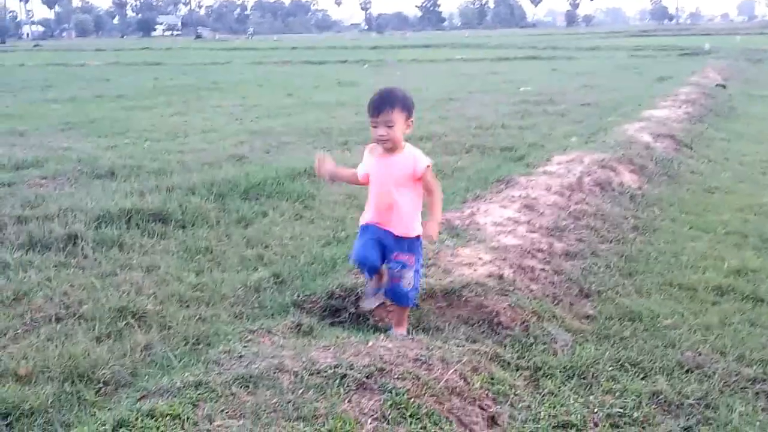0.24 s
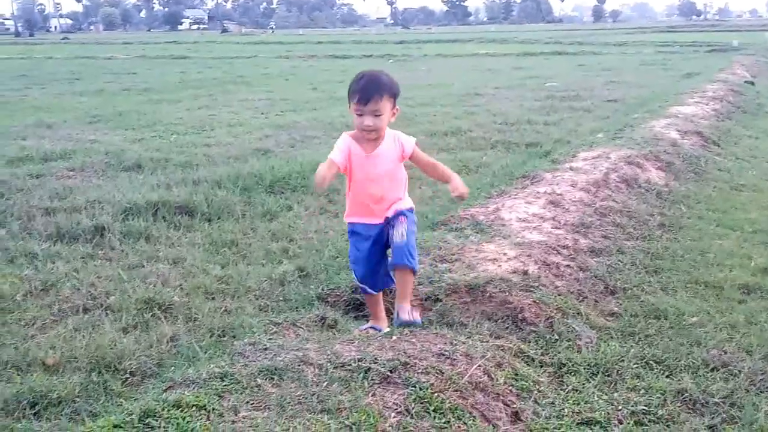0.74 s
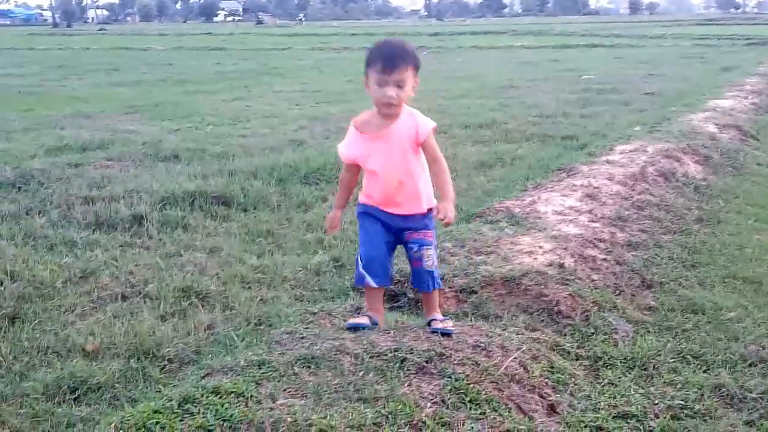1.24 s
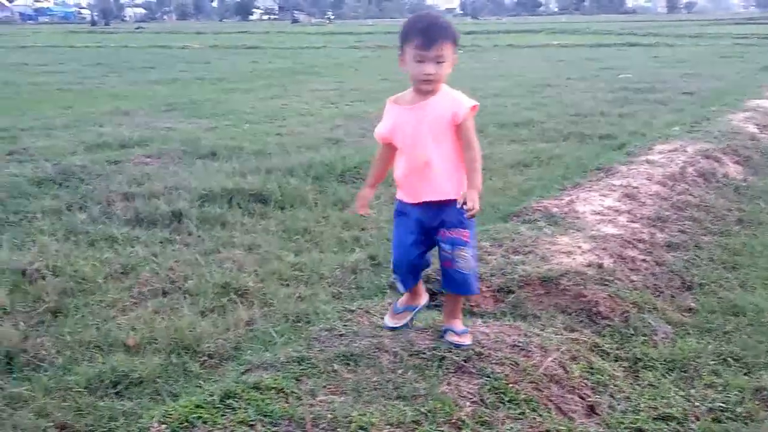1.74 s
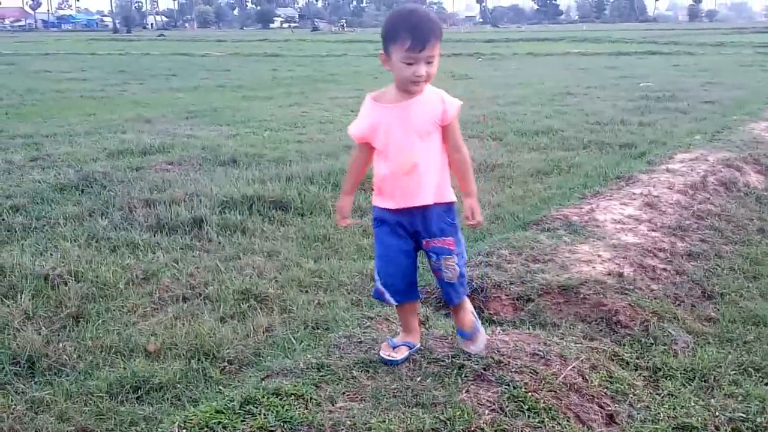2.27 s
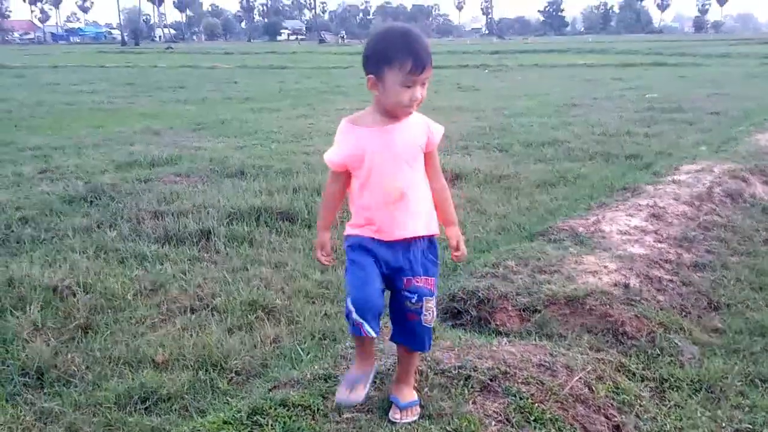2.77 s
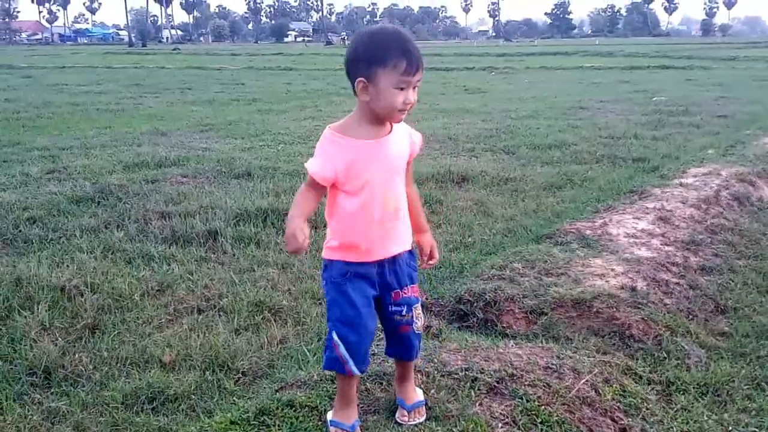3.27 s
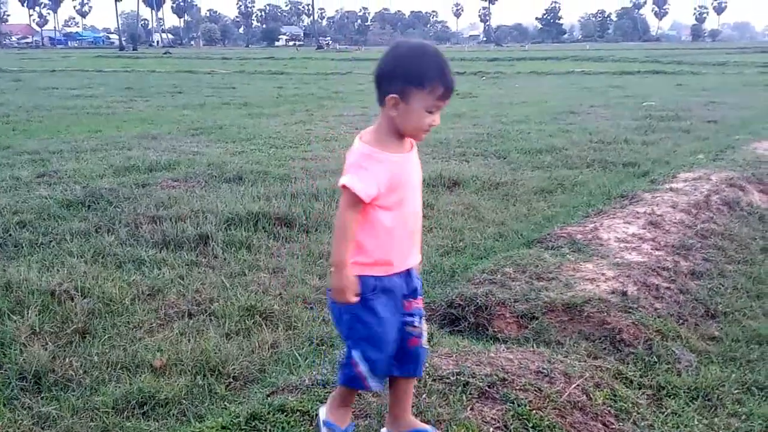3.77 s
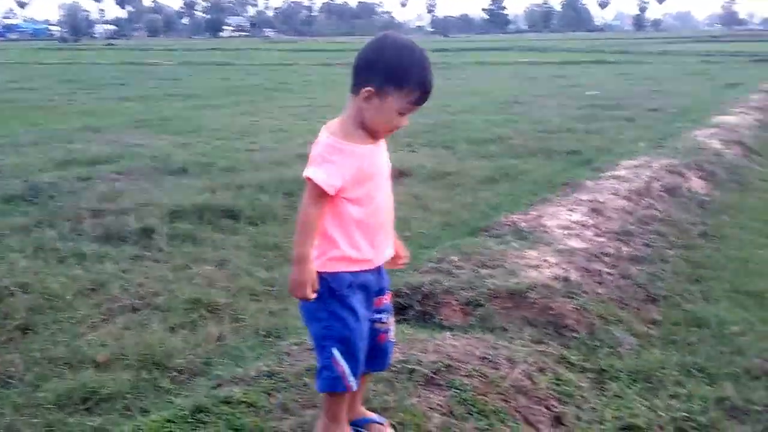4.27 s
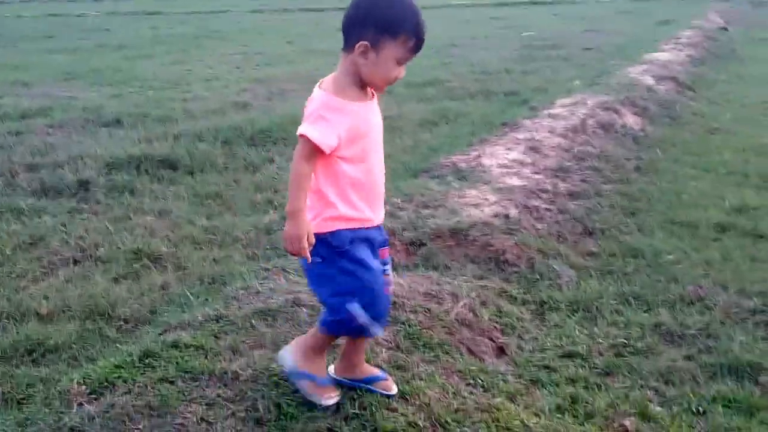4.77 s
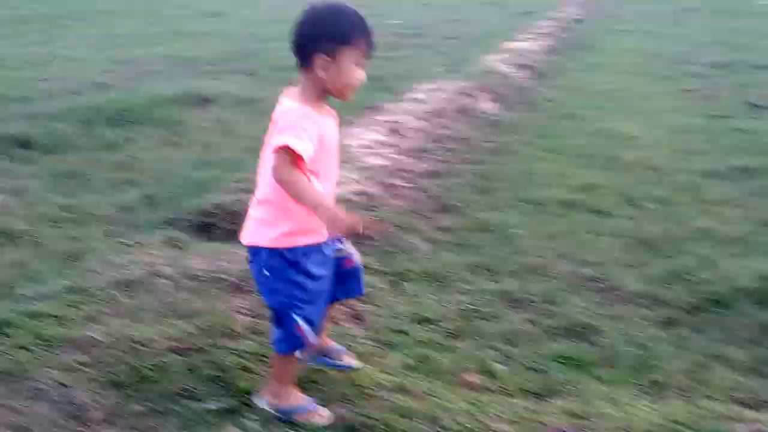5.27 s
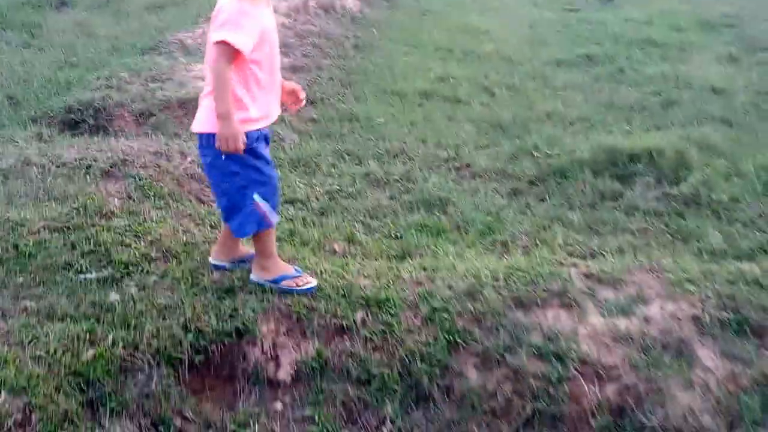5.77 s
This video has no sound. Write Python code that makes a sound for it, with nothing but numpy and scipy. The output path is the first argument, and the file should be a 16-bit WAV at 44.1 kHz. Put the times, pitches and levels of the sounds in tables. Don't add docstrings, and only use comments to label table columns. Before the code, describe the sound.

Evening field ambience: fast cricket trills, blurred flock chatter, low wind knocks, faint engine putter, soft grassy footsteps, then repeated chips and high whistles.

```python
import sys
import numpy as np
from scipy import signal
from scipy.fft import rfft, irfft
from scipy.io import wavfile
from scipy.ndimage import uniform_filter1d

SR = 44100
rng = np.random.default_rng(int(sys.argv[2]) if len(sys.argv) > 2 else 0)


def voltage_ratio(decibels):
    exponent = np.asarray(decibels, float) / 20
    return 10 ** exponent


def wrap_up_sound(samples):
    columns = np.atleast_2d(samples).T
    tamed = np.clip(columns, -1, 1)
    steps = np.round(tamed * 32767).astype(np.int16)
    wavfile.write(sys.argv[1], SR, steps)


N = 265482
T = np.arange(N) / SR
BLUR_HZ, BLUR = 110, .4

# (time [s], lead over the mean trill beat [turns], level [dB])
NEAR_CRICKET = [(0, -.32, -55.5), (1.6, -.3, -53.5), (2.7, -.36, -54.5), (3.5, -.36, -57), (4.5, -.36, -54),
                (5.2, -.36, -55.4), (5.5, -.29, -57), (6, -.27, -56.5)]
SECOND_CRICKET = [(0, -.06, -71.5), (2.2, .36, -65.5), (3.7, .25, -65), (6, .21, -73)]
THIRD_CRICKET = [(0, -.29, -71), (1.6, -.05, -74), (2.6, -.3, -84.5), (6, -.2, -84.5)]
TRILL_HZ = 8.31, 8.6, 8.51
WING_HZ = 8860, 12780, 9200, 9850
CRICKET_TRIM_DB = 8, -23, 13, 13.5

# (time [s], level [dB])
CHORUS_LEVEL = [(0, -51.5), (1.0, -50.5), (2.2, -54), (2.6, -52.5), (4.0, -55.5), (4.3, -51), (5.15, -52.5),
                (5.5, -52.5), (6.02, -51)]
# (frequency [Hz], level per Hz [dB])
CHORUS_COLOUR = [(710, -45), (1200, -119), (1270, -30), (1650, -11), (2190, -16), (2440, -18), (2740, -2),
                 (3390, 0.5), (3560, -0.5), (4260, -15.5), (5000, -21.5), (6500, -67), (11000, -120)]
# (middle time [s], length [s], rise [dB])
CHORUS_SWELLS = [(0.118, 0.078, 5), (0.483, 0.14, 3), (0.74, 0.073, 5), (0.996, 0.076, 5.5),
                 (1.242, 0.14, 4.5), (1.47, 0.27, 4.5), (1.7, 0.081, 7), (1.887, 0.23, 5),
                 (2.122, 0.24, 6.5), (2.356, 0.13, 6), (2.633, 0.087, 2), (2.9, 0.17, 1), (3.26, 0.044, 0),
                 (3.554, 0.05, 2), (3.918, 0.08, 7.5), (4.035, 0.081, 5), (1.77, .025, -4), (2.55, .05, -3),
                 (0.208, .03, -2.5), (0.408, 0.027, -2.5), (.57, 0.033, -2.5), (5.015, 0.1, 1),
                 (5.55, 0.12, 5), (5.785, 0.1, 6)]

# (time [s], level [dB])
WIND_LEVEL = [(0.0, -53), (0.1, -46), (0.35, -48.5), (1.6, -48), (2.8, -51), (3.12, -39), (3.3, -49),
              (3.57, -46.5), (3.7, -45), (4.2, -51), (4.68, -45), (4.78, -51), (4.95, -44.5), (5.2, -54),
              (5.6, -48.5), (5.82, -51), (6.02, -36)]
# (frequency [Hz], level per Hz [dB])
WIND_COLOUR = [(12, -84), (20, -49), (101, 2), (189, -7.5), (248, -13), (330, -17.5), (365, -21.5),
               (409, -30.5), (543, -45.5), (600, -58), (780, -82), (1320, -120)]
# (frequency [Hz], share [dB])
LOOSE_EDDIES = [(55, 0), (90, -30)]
# (time [s], peak level [dB], pitch [Hz], length [s])
AIR_KNOCKS = [
    (0.287, -20.5, 101, 0.034),
    (2.829, -18, 136.5, 0.033),
    (3.158, -16, 130, 0.022),
    (3.178, -11, 160, 0.025),
    (4.266, -17, 82.4, 0.028),
    (4.825, -16.5, 108, 0.015),
    (5.929, -16, 110, 0.029),
]

# (time [s], level [dB])
ENGINE_LEVEL = [(0.0, -54), (0.03, -45.5), (1.0, -61.5), (1.05, -42.5), (3.08, -44.5), (3.19, -37),
                (3.22, -42.5), (5.73, -54.5), (6.02, -46)]
# (time [s], lead [turns])
CRANK_LEAD = [(0, -.17), (.5, -.24), (1.25, -.41), (1.75, -.55), (2.25, -.62), (2.75, -.49), (3.25, -.26),
              (3.75, .06), (4.1, .2), (6.02, .6)]
# (frequency [Hz], width [Hz], level [dB])
EXHAUST_PIPE = [(129, 111, 2.5), (220, 92, 1), (330, 68, -33)]

# (frequency [Hz], level per Hz [dB])
LEAF_COLOUR = [(350, -25), (600, 3), (1100, -4), (1900, 13), (2500, -39), (4600, 2), (7300, 6.5),
               (8000, 12.5), (16500, -28.5)]
# (frequency [Hz], level per Hz [dB])
INSECT_COLOUR = [(7900, -9), (8500, 0), (9300, 1), (9700, -9), (10600, -1.5), (11400, 1), (12000, -44),
                 (13300, -24), (13900, -18), (14800, -9), (16500, -32)]

# (time [s], peak level [dB], length [s], top brightness [dB], body [dB])
STEPS = [(0.158, -46, 0.053, -29, -3), (0.349, -43, 0.0082, -17, 1), (0.476, -42.5, 0.058, -29, -11),
         (0.9418, -44, 0.03, -13, -5), (1.125, -32, 0.015, -1, 0), (1.522, -36.5, 0.03, -6, -9),
         (1.862, -42, 0.066, -30, -22), (1.932, -44, 0.035, -3.5, -14), (2.232, -68, 0.03, -4, -1),
         (2.49, -45, 0.046, 2, -4), (2.618, -42, 0.018, -32, -7), (2.882, -41.5, 0.053, -7, -4.5),
         (3.226, -46, 0.097, -27, -12), (3.32, -44, 0.12, 0, -19), (3.453, -54.5, 0.051, -35, 2),
         (3.533, -51.5, 0.12, 5, 4), (3.72, -76, 0.03, -2, -4), (3.944, -49, 0.049, -25, 9),
         (3.98, -39.5, 0.048, 5, -3), (4.522, -46.5, 0.048, -31, 4), (4.593, -43, 0.051, 2, 0),
         (4.88, -47, 0.027, -8, 11), (4.988, -40.5, 0.036, 10.5, -0.5), (5.137, -58, 0.071, -30, 14)]
# (time [s], level [dB], top brightness [dB])
GRASS_SWEEP = [(4.45, -63, -16), (4.6, -64, -1), (4.75, -67.5, -2), (5.22, -67.5, -8), (5.3, -59, 4.5),
               (5.52, -53.5, 15), (5.8, -52.5, 5.5), (6.02, -62, 3)]
# (frequency [Hz], level per Hz [dB])
GRASS_COLOUR = [(400, -64), (800, -6), (2000, 5.5), (4000, 7), (6500, 2.5), (9500, 1), (12000, -13.5),
                (13700, -14), (15000, -4.5), (17000, -4)]

# (time [s], pitch [Hz], bend [Hz], length [s], level [dB])
FLOCK_VOICES = [(0.078, 3430, -58, 0.081, -52.5), (0.083, 3260, -260.0, 0.083, -54.0),
                (0.219, 3574, -130.0, 0.05, -48), (0.343, 3230.0, 62, 0.053, -52),
                (0.481, 3530.0, -22, 0.066, -52), (0.591, 3250.0, -240.0, 0.055, -50),
                (0.695, 3740, 2, 0.086, -52.0), (0.713, 3750.0, 40.0, 0.079, -53),
                (0.773, 3430, 20.0, 0.039, -43), (0.971, 2730.0, 0.0, 0.06, -55.0),
                (0.972, 3467, -58, 0.078, -54), (1.099, 3370, 40.0, 0.069, -49),
                (1.19, 3060.0, 40.0, 0.069, -52.0), (1.238, 3490.0, -60.0, 0.048, -49),
                (1.285, 2745, -55, 0.053, -56), (1.395, 3430, -190.0, 0.089, -50.5),
                (1.468, 3570, -90.0, 0.058, -50), (1.508, 3250.0, -220.0, 0.057, -55),
                (1.652, 3380, -18, 0.051, -50), (1.674, 2760.0, 190.0, 0.066, -56),
                (1.789, 3040.0, 86, 0.049, -48), (1.89, 3210.0, -190.0, 0.066, -48),
                (1.916, 3404, 61.5, 0.04, -42), (2.025, 3090, -40.0, 0.04, -50.0),
                (2.1, 3510, -130.0, 0.057, -47), (2.169, 3480, -17, 0.042, -50.5),
                (2.315, 3510.0, -150.0, 0.058, -48.0), (2.328, 2760.0, -20.0, 0.055, -54),
                (2.597, 3460, 59, 0.069, -51), (2.911, 3340.0, 106, 0.06, -48.5),
                (3.227, 3380.0, -58, 0.049, -51), (3.537, 3405, -90.0, 0.049, -53),
                (3.636, 2820.0, -22, 0.03, -48), (3.784, 3404, -130.0, 0.043, -48),
                (4.222, 3470.0, 20.0, 0.043, -55.5), (4.283, 3400, -13, 0.042, -55.5),
                (4.739, 2740, 0.0, 0.045, -52)]
# (time [s], pitch [Hz], bend [Hz], length [s], level [dB])
LOW_CALLS = [(0.772, 2050, 40, .063, -64.5), (1.235, 2220, -20, .035, -66), (1.325, 1940, 3, .036, -63.5),
             (1.679, 1800, -60, 0.053, -71), (1.852, 1970, 80, .07, -72), (2.28, 1950, -20, .07, -68),
             (2.361, 1710, 40, .04, -64), (2.485, 2206, -200, 0.052, -59.5), (2.513, 2000, -40, .06, -64.5),
             (2.57, 2110, 60, 0.066, -65), (2.8, 1887, -40, 0.072, -69.5), (2.95, 1900, 0, 0.055, -67),
             (3.035, 2150, 0, 0.026, -65), (3.07, 1866, 43, 0.05, -60.5), (3.14, 1960, -60, 0.033, -67),
             (3.992, 2280, -40, .046, -69)]

# (time [s], snap level [dB], slap level [dB])
STALK_TICKS = [(.132, -56, -70), (.178, -52, -70), (.357, -55, -61), (.485, -51, -70), (.513, -42.5, -51.5),
               (.79, -60, -49.5), (.942, -50, -60), (1.014, -59, -66), (1.135, -43, -38.5),
               (1.886, -54, -66), (2.624, -41.5, -55), (3.256, -55, -72), (3.452, -54, -72),
               (3.83, -58, -69), (3.954, -48, -61), (5.325, -49, -66)]
# (frequency [Hz], width [Hz], level [dB])
SOLE_MODES = [(790, 205, 13), (1498, 42, 7), (2000, 47, 7), (2220, 58, 11)]

# (time [s], pitch [Hz], bend [Hz], length [s], level [dB], arch [Hz] if any)
CHIRPS = [(0.63, 3790, -26, 0.19, -60.5), (1.765, 7100, -2200, 0.015, -66),
          (1.871, 5600, -1200, .025, -59, 1900), (1.896, 7200, -2900, 0.017, -62),
          (1.675, 3350, -100, .006, -47), (1.72, 3300, -100, .005, -51), (2.264, 4220, -100, 0.034, -57.5),
          (2.707, 4400, -49, .05, -64), (2.855, 3740, -100, 0.049, -60), (3.035, 3740, 30, 0.083, -61.5),
          (2.43, 3480, 250, 0.073, -58), (4.909, 3604, -88, 0.03, -52), (5.202, 3474, -63.5, 0.054, -52),
          (5.322, 3250, -80, 0.032, -52), (5.278, 3370, -390, 0.04, -51), (5.487, 3220, -190, 0.083, -54),
          (5.547, 3310, 41, 0.062, -49.5), (5.79, 3250, 148, .065, -55), (5.958, 3400, -280, 0.044, -49)]
# (time [s], length [s], level [dB])
CHIPS = [
    (2.8, 0.053, -63),
    (4.15, 0.051, -51.5),
    (4.373, 0.062, -53),
    (4.613, 0.065, -49.5),
    (4.838, 0.064, -48),
    (5.06, 0.068, -47.5),
    (5.282, 0.054, -48.5),
    (5.522, .045, -49),
    (5.72, 0.071, -52),
    (5.938, 0.077, -49),
]
# (start [s], climb [s], drop [s], scoop from below [Hz], level [dB])
WHISTLES = [
    (3.33, 0.105, 0.02, -300, -73),
    (3.862, 0.281, 0.095, -90, -63.5),
    (4.418, 0.052, 0.012, -100, -70),
    (4.558, 0.289, 0.086, 30, -60.5),
    (5.063, 0.106, 0.018, 2100, -60),
    (5.232, 0.315, 0.08, 600, -59),
    (5.787, 0.089, 0.016, 800, -58.5),
    (5.945, 0.23, .08, 300, -60),
]
# (time [s], gain [dB])
HEAD_TURN = [(0, 0), (3.8, 0), (3.86, -8), (4.03, 0), (5.46, 0), (5.51, -9), (5.55, -12), (5.58, 1),
             (5.7, 0), (6.02, 0)]

# (frequency [Hz], threshold [dB])
BAND_GATE = [(400, -8.5), (4000, -8), (4600, -5), (7400, -3.5), (7600, 0.5), (8300, -22), (10800, -2),
             (11700, 3.5), (12250, 8), (12500, 0), (13000, -1), (13250, 7), (13900, -2), (14300, 2),
             (15800, -2.5)]


def evened(x):
    return x / np.sqrt(np.mean(x ** 2) + 1e-20)


def read(points, hz):
    f, value = np.transpose(points)
    return np.interp(np.log(hz + 1), np.log(f + 1), value)


def curve(rows):
    s, *columns = np.transpose(rows)
    return [np.interp(T, s, c) for c in columns]


def add(mix, s, sound):
    part = mix[..., max(round(s * SR), 0):][..., :sound.shape[-1]]
    part += sound[..., :part.shape[-1]]


def coloured(x, points):
    gain = voltage_ratio(read(points, np.fft.rfftfreq(x.shape[-1], 1 / SR)))
    return irfft(rfft(x) * gain, x.shape[-1])


def resonate(x, hz, width):
    turn = np.exp(2j * np.pi * hz * T)
    r = np.exp(-np.pi * width / SR)
    return 2 * (turn * signal.lfilter([1 - r], [1, -r], x / turn)).real


def ports(near, other, same, lag_ms, pan_db):
    same = np.clip(same, 0, 1)
    late = np.roll(near, round(lag_ms * SR / 1000))
    left = same * late + np.sqrt(1 - same ** 2) * other
    return np.array([left * voltage_ratio(pan_db / 2), near * voltage_ratio(-pan_db / 2)])


def noise(points, patchy_db, flicker_db, size=1024):
    frames, hz = 4 * N // size + 5, np.fft.rfftfreq(size, 1 / SR)
    a, b, c, d, patches = rng.standard_normal((frames, len(hz), 5)).T
    flicker = evened(uniform_filter1d(patches[:4].sum(0), size=3))
    patches = uniform_filter1d(patches, size=12, axis=0)
    patches = evened(uniform_filter1d(patches, size=10, axis=1))
    level_db = read(points, hz)[:, None] + patchy_db * patches + flicker_db * flicker
    z = np.array([a + 1j * b, c + 1j * d]) * voltage_ratio(level_db)
    return evened(signal.istft(z, nperseg=size, noverlap=size * 3 // 4)[1][:, :N])


def wander(hz):
    return evened(signal.lfilter(*signal.butter(2, hz, fs=SR), rng.standard_normal(N)))


def glide(first_hz, last_hz, length, arch_hz=0):
    u = np.linspace(0, 1, round(length * SR))
    hz = first_hz + (last_hz - first_hz) * u + arch_hz * np.sin(np.pi * u)
    tone = np.sqrt(2) * np.sin(2 * np.pi * np.cumsum(hz) / SR)
    return tone * signal.windows.tukey(len(hz), .6)


def echoed(x, wet):
    t = np.arange(3000) / SR
    sparse = rng.standard_normal((2, 3000)) * (rng.random((2, 3000)) < .03)
    tail = sparse * voltage_ratio(-60 * t / 0.068)
    tail = tail / np.linalg.norm(tail[0])
    return x + wet * signal.oaconvolve(x * np.ones((2, 1)), tail, axes=1)[:, :N]


def cricket(rows, trill_hz, strokes_hz, wing_hz):
    lead, level_db = curve(rows)
    beat = (trill_hz * T + lead - .26) % 1
    swell = np.clip((beat - .24) / 0.3, 0, 1) ** 0.8
    swell = swell * np.minimum((1 - beat) / 0.024, 1)
    strokes = strokes_hz * T + 0.15 * wander(4)
    burst = np.sin(np.pi * (strokes % 1)) ** 3 * voltage_ratio(1.7 * wander(500))
    turns = np.cumsum(wing_hz * (1 - .08 * (strokes % 1 - .5))) / SR
    start = rng.random((2, 1000))[:, np.abs(strokes).astype(int)]
    level = voltage_ratio(np.maximum(level_db, rows[0][2] - 14))
    return level * swell * burst * np.sin(2 * np.pi * (turns + start))


def crickets():
    trim = voltage_ratio(CRICKET_TRIM_DB)
    near = trim[0] * cricket(NEAR_CRICKET, TRILL_HZ[0], 126, WING_HZ[0])
    near = near + trim[1] * cricket(NEAR_CRICKET, TRILL_HZ[0], 160, WING_HZ[1])
    second = trim[2] * cricket(SECOND_CRICKET, TRILL_HZ[1], 125, WING_HZ[2])
    third = trim[3] * cricket(THIRD_CRICKET, TRILL_HZ[2], 129, WING_HZ[3])
    near = echoed(ports(*near, .85, .93, 11), .3)
    return near + ports(*second, .6, .9, 1.5) + ports(*third, .5, .9, 0)


def chorus():
    voices = np.zeros((2, N))
    for s, u, bend, length, size, side in rng.random((1000, 6)):
        hz = 1650 + 2200 * u ** .6
        first_hz, last_hz = hz * (1 + 0.07 * (bend - .3)), hz * (1 - 0.061 * (bend - .3))
        note = glide(first_hz, last_hz, 0.017 + 0.0397 * length)
        add(voices[int(2 * side)], s * T[-1], voltage_ratio(read(CHORUS_COLOUR, hz) + 3 * size) * note)
    level_db = curve(CHORUS_LEVEL)[0]
    for s, length, rise_db in CHORUS_SWELLS:
        level_db = level_db + rise_db * np.exp(-((T - s) / (.5 * length)) ** 4)
    voices = evened(echoed(voices * (1 + BLUR * wander(BLUR_HZ)), .6))
    mix = .65 * voices + .6 * noise(CHORUS_COLOUR, patchy_db=2.5, flicker_db=.8)
    return voltage_ratio(level_db + 2.5) * ports(*mix, 0.29, .9, 8)


def wind():
    level = voltage_ratio(curve(WIND_LEVEL)[0] + 3.0)
    shared = noise(WIND_COLOUR, patchy_db=-2.0, flicker_db=4.0, size=2048)
    shared = level * ports(*shared, 0.67, 1.435, 6)
    loose = noise(WIND_COLOUR, patchy_db=2.0, flicker_db=2.5, size=2048)
    loose = level * coloured(loose, LOOSE_EDDIES) * voltage_ratio([[4.5], [-4.5]])
    return shared - coloured(shared, LOOSE_EDDIES) + loose


def engine():
    turns = 19.8 * T + curve(CRANK_LEAD)[0] + .1
    fired = np.flatnonzero(np.diff(np.floor(turns)) > 0)
    strength_db = 1.5 * rng.standard_normal(len(fired)) + 1.2 * (-1.) ** np.arange(len(fired))
    pulses = np.zeros(N)
    pulses[fired] = -voltage_ratio(strength_db)
    drive = evened(pulses) + .55 * rng.standard_normal(N)
    pipe = np.zeros(N)
    for hz, width, db in EXHAUST_PIPE:
        pipe += voltage_ratio(db) * resonate(resonate(drive, hz, width), hz, width)
    far = coloured(pipe, [(40, -34.5), (70, 5.5), (360, -1), (470, -31.0), (700, -44)])
    return ports(voltage_ratio(curve(ENGINE_LEVEL)[0] - 1.5) * evened(far), 0, 0.7, 0.99, 5.4)


def air():
    leaves = ports(*noise(LEAF_COLOUR, patchy_db=6.5, flicker_db=-3.0), 0.45, 0.93, 10.0)
    insects = ports(*noise(INSECT_COLOUR, patchy_db=1.2, flicker_db=0.0), 0.38, .93, 2.1)
    return voltage_ratio(-66) * leaves + voltage_ratio(-59.5) * insects


def grass():
    snaps = voltage_ratio(2.4 * np.minimum(rng.exponential(1, (2, N)), 5))
    snaps = snaps * (rng.random((2, N)) < 4000 / SR)
    rustle = 1.6
    fizz = (evened(snaps) + rustle) * rng.standard_normal((2, N))
    fizz = evened(coloured(fizz, GRASS_COLOUR))
    top = coloured(fizz, [(9500, -80), (11500, 0), (20000, 0)])
    body = coloured(fizz, [(20, 0), (2500, 0), (4000, -80)])
    middle = fizz - top - body
    level_db, bright_db = curve(GRASS_SWEEP)
    onset = np.clip((T - GRASS_SWEEP[0][0]) / 0.035, 0, 1)
    sweep = voltage_ratio(level_db + 8.0 + 1.0 * wander(24)) * onset
    always = voltage_ratio(-88.0 + 3.1 * wander(17))
    gains = np.array([sweep + always, sweep * voltage_ratio(bright_db + 1.5), sweep * voltage_ratio(-2.0)])
    for s, peak_db, length, bright_db, body_db in STEPS:
        u = np.arange(round(3 * length * SR)) / SR / length
        shape = voltage_ratio(peak_db + 12) * u ** 1.43 * np.exp(-3.2 * u)
        add(gains, s, shape * voltage_ratio([[0], [bright_db], [body_db]]))
    mix = gains[0] * middle + gains[2] * body
    return ports(*mix, 0.31, 0.945, 6.1) + ports(*(gains[1] * top), 0.5, 0, 4.5)


def flock():
    out = np.zeros(N)
    for s, hz, bend_hz, length, level_db in FLOCK_VOICES + LOW_CALLS:
        lift_db = 5.5 * (hz < 2400)
        add(out, s, voltage_ratio(level_db + lift_db) * glide(hz, hz + bend_hz, 1.133 * length))
    husky = out * (1 + BLUR * wander(BLUR_HZ)) / np.hypot(1, BLUR)
    return echoed(ports(voltage_ratio(-2) * husky, 0, 1, .9, 7), .45)


def ticks():
    out, t = np.zeros(N), np.arange(900) / SR
    slap = np.zeros(900)
    for hz, width, db in SOLE_MODES:
        slap += voltage_ratio(db) * np.exp(-np.pi * width * t) * np.sin(2 * np.pi * hz * t)
    slap *= np.minimum(t / 0.00032, 1)
    for s, snap_db, slap_db in STALK_TICKS:
        grit = rng.standard_normal(900) * np.exp(-t / 0.0018)
        snap = coloured(grit, [(3000, -23), (5000, -3), (6800, 12), (9000, -12), (16000, -11)])
        add(out, s, voltage_ratio(snap_db) * snap + voltage_ratio(slap_db - 15.0) * slap)
    return echoed(ports(out, 0, 1.0, .6, 15.3), 0.34)


def air_knocks():
    knocks = np.zeros(N)
    for s, peak_db, hz, length in AIR_KNOCKS:
        add(knocks, s, voltage_ratio(peak_db - 17.5) * glide(1.294 * hz, 0.78 * hz, length))
    return ports(coloured(knocks, [(25, -14), (65, 0)]), 0, 0.56, 3.55, 23.0)


def chirpers():
    out = np.zeros(N)
    chips = [(s, 4020, -4500 * length, length, level_db, 130) for s, length, level_db in CHIPS]
    for side_gain, calls in ((.3, chips), (.15, CHIRPS)):
        for s, hz, bend_hz, length, level_db, *arch in calls:
            main = glide(hz, hz + bend_hz, length, *arch)
            side = glide(hz + 440, hz + bend_hz + 380, length, *arch)
            add(out, s, voltage_ratio(level_db) * (main + side_gain * side))
    out = out * voltage_ratio(3.5) * (1 + 0.22 * wander(220))
    return echoed(ports(out, 0, 1, .6, 8), .4)


def whistler():
    out = np.zeros(N)
    quaver_hz = 12 * wander(70)
    rest_hz = 6350
    for s, climb, drop, scoop_hz, level_db in WHISTLES:
        t = np.arange(0, climb + drop, 1 / SR)
        up, down = np.minimum(t / climb, 1), np.maximum(t - climb, 0) / drop
        top_hz = 6820 + 1450 * climb
        bend = 2.5 * (climb / .29) ** .6
        hz = rest_hz + (top_hz - rest_hz) * up ** bend - scoop_hz * np.exp(-t / .021)
        fall_hz = 2620 * (drop / .085) ** .65
        hz = hz - fall_hz * np.sin(np.pi / 2 * down ** 1.4)
        hz = uniform_filter1d(hz, size=300, mode="nearest")
        hz = hz + quaver_hz[round(s * SR):][:len(t)].take(np.arange(len(t)), mode="clip")
        effort_db = np.interp(up + down, [0, 0.7, 1, 2], [-10.5, 0, -3, -14])
        tone = np.sqrt(2) * np.sin(2 * np.pi * np.cumsum(hz) / SR) * signal.windows.tukey(len(t), .08)
        add(out, s, voltage_ratio(level_db + effort_db) * tone)
    out = out * voltage_ratio(9.5 + curve(HEAD_TURN)[0] + 1.44 * wander(60))
    return echoed(ports(out, 0, 1, .25, 17), .3)


def scene():
    beds = crickets() + chorus() + wind() + engine() + air()
    return beds + grass() + flock() + ticks() + air_knocks() + chirpers() + whistler()


def gate(x, size=7):
    window = np.sin(np.pi * (np.arange(2048) + .5) / 2048)
    hz, t, z = signal.stft(x, SR, window, 2048, 1024)
    edges = np.arange(0, len(hz), size)
    power = np.add.reduceat(abs(z) ** 2, edges, axis=1)
    usual = np.median(power, axis=2, keepdims=True)
    kept = power > usual * voltage_ratio(2 * read(BAND_GATE, hz[edges]))[:, None]
    kept = np.repeat(kept, size, axis=1)[:, :len(hz)]
    return signal.istft(z * kept, SR, window, 2048, 1024)[1][:, :N]


def roll_off(x):
    return signal.sosfilt(signal.butter(12, 16940, fs=SR, output="sos"), x)


def record(dry):
    limited = coloured(dry, [(15720, 0), (15900, -90)])
    return roll_off(gate(limited))


dry = scene()
out = record(dry)
wrap_up_sound(out)
```